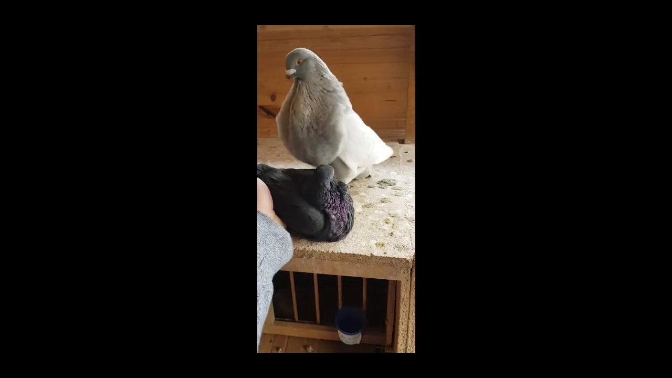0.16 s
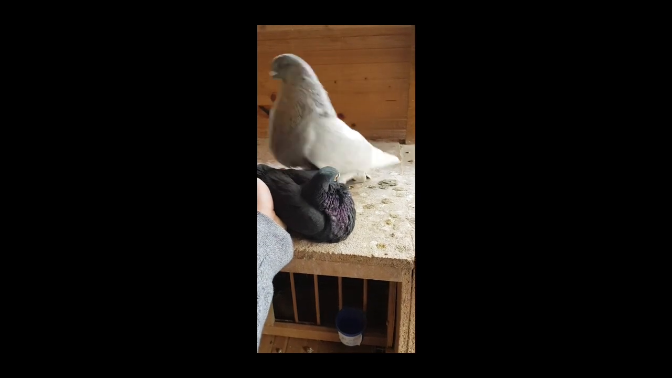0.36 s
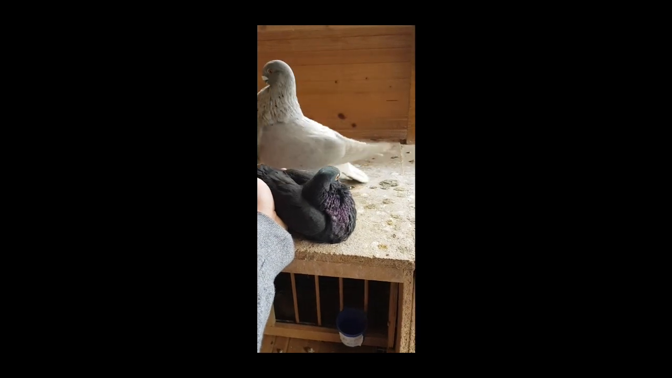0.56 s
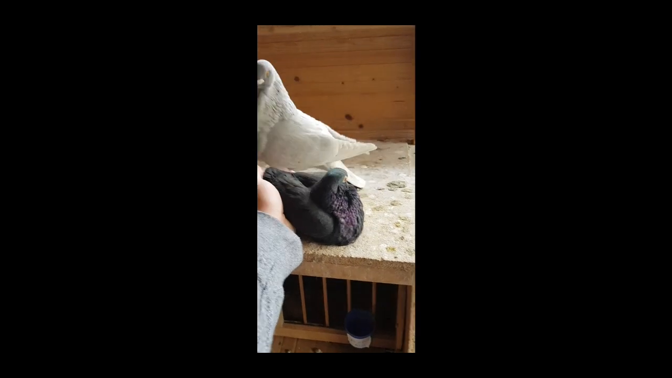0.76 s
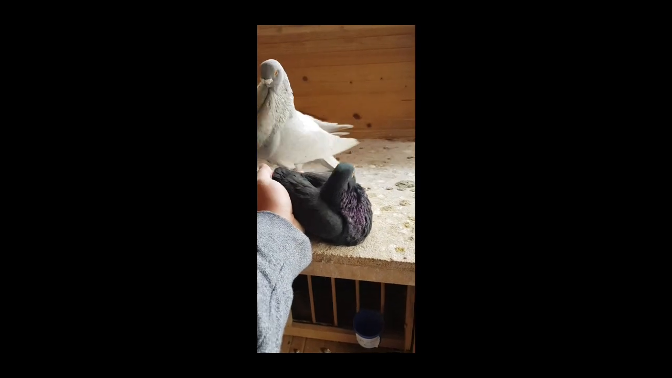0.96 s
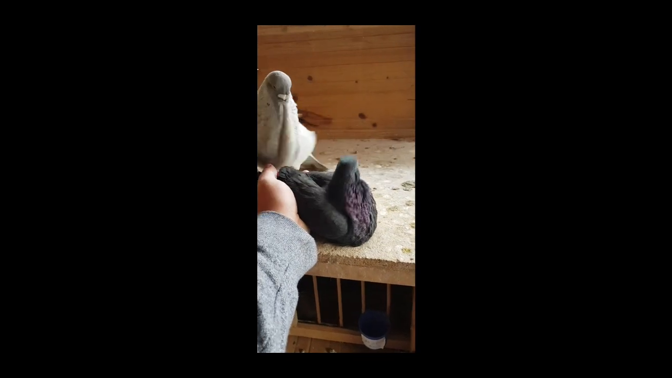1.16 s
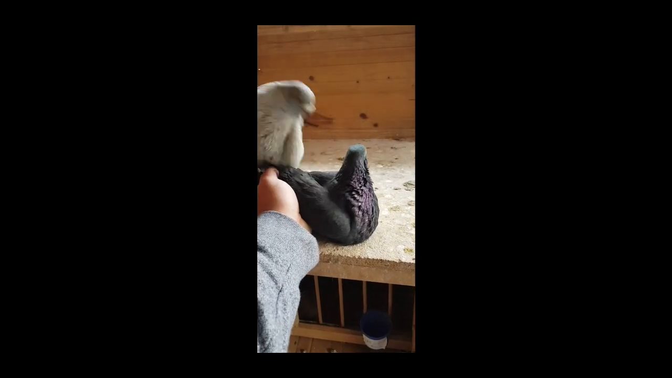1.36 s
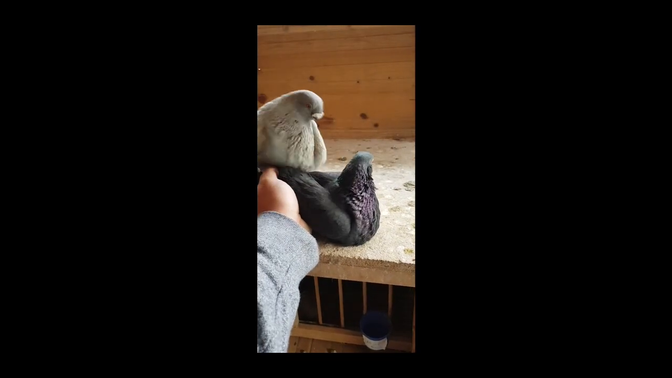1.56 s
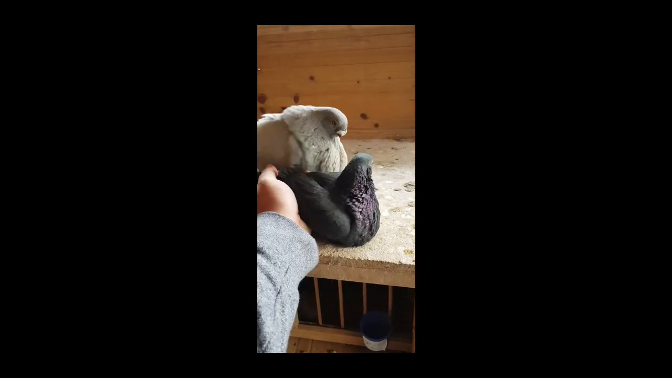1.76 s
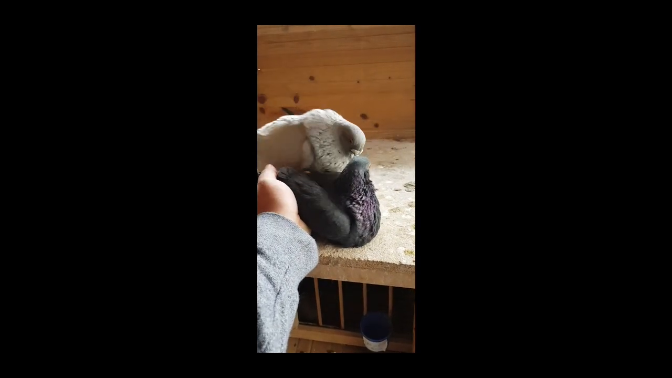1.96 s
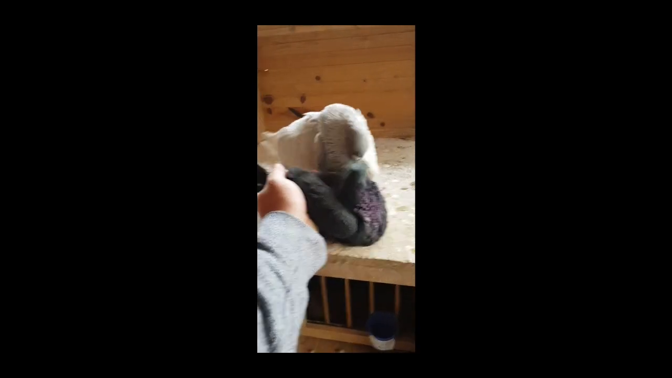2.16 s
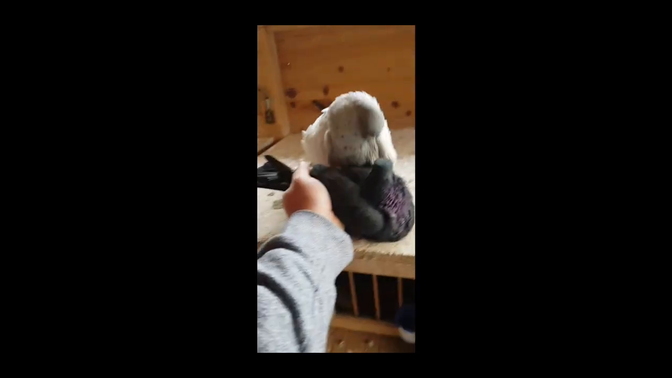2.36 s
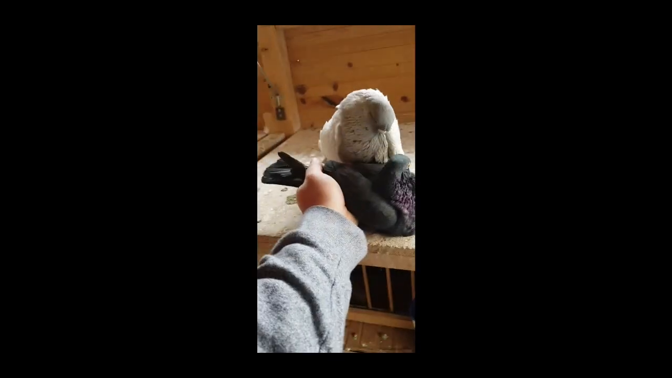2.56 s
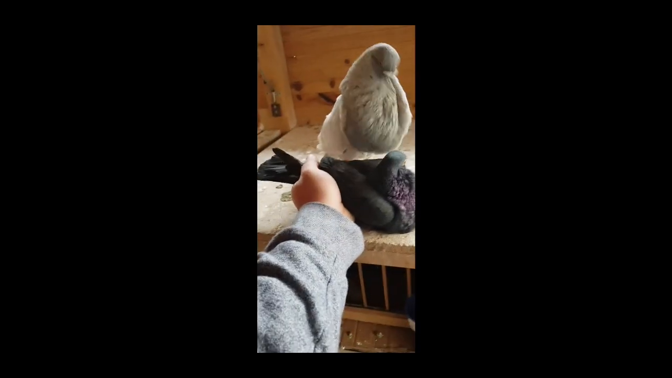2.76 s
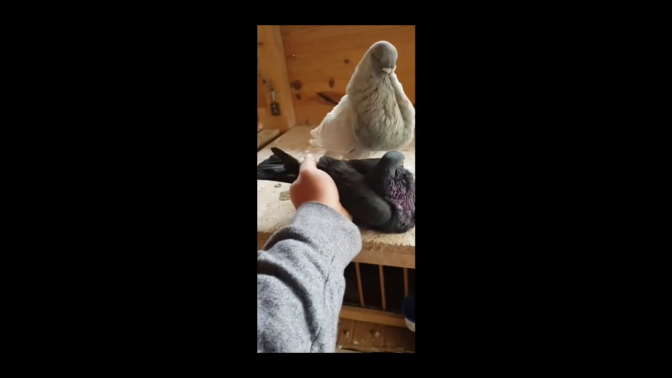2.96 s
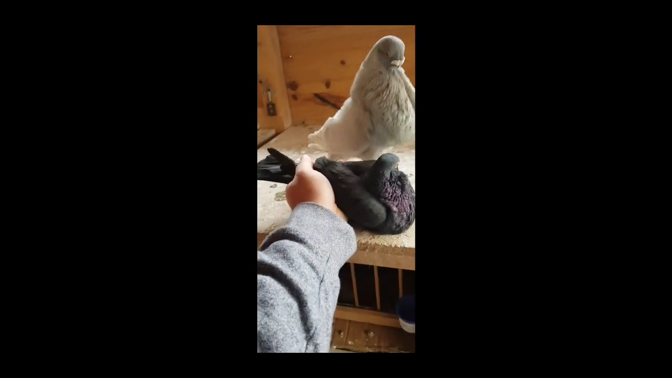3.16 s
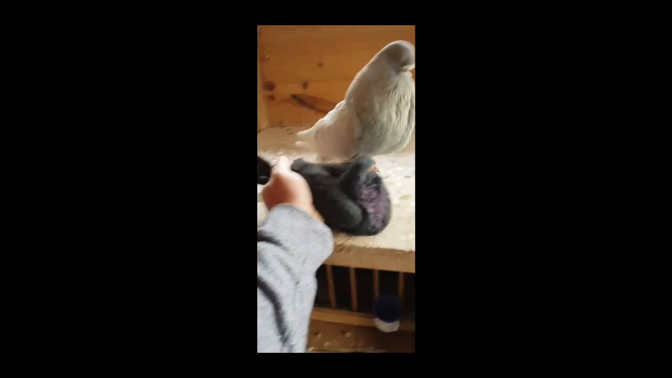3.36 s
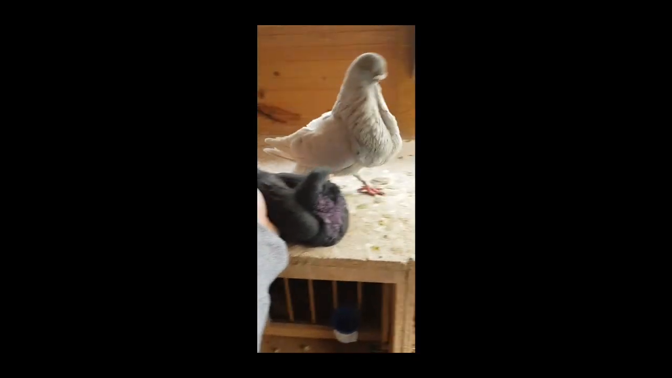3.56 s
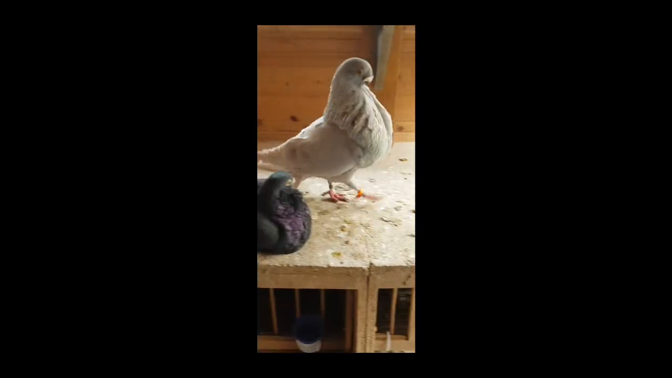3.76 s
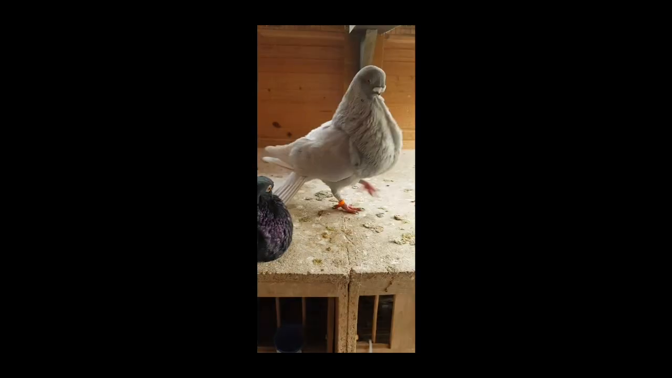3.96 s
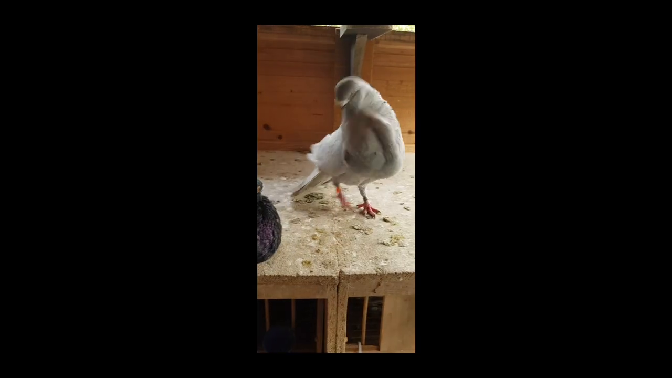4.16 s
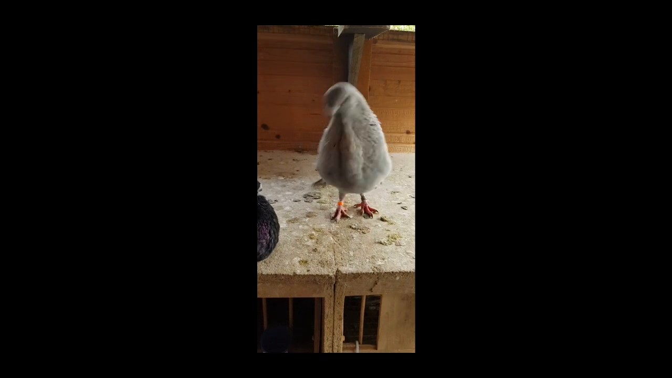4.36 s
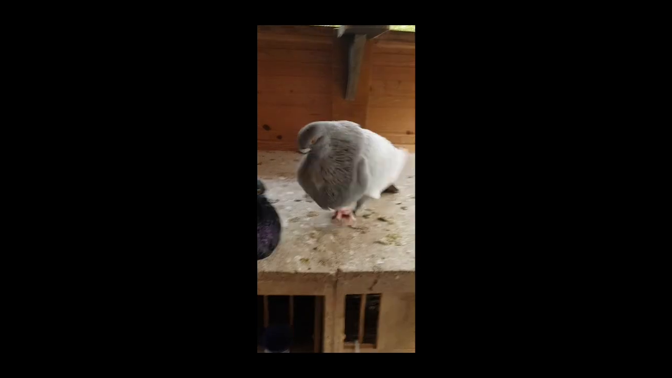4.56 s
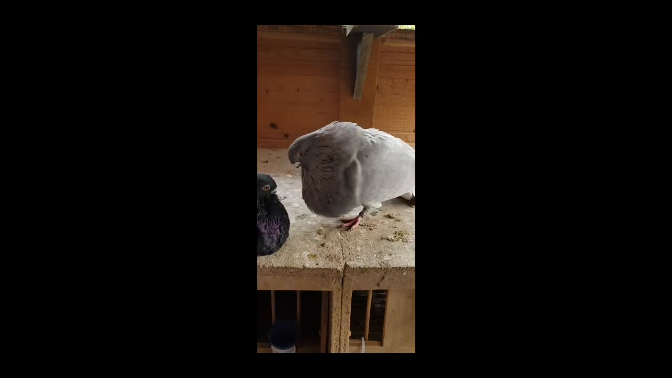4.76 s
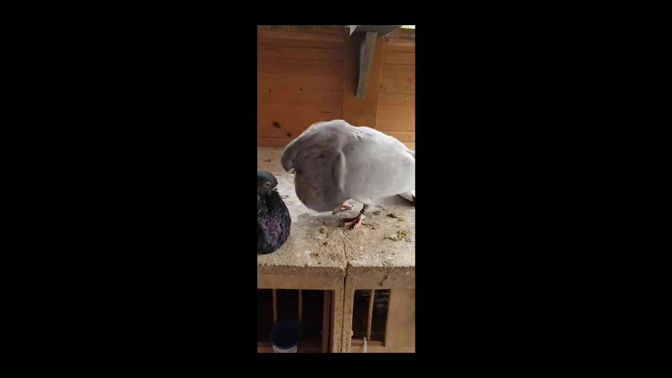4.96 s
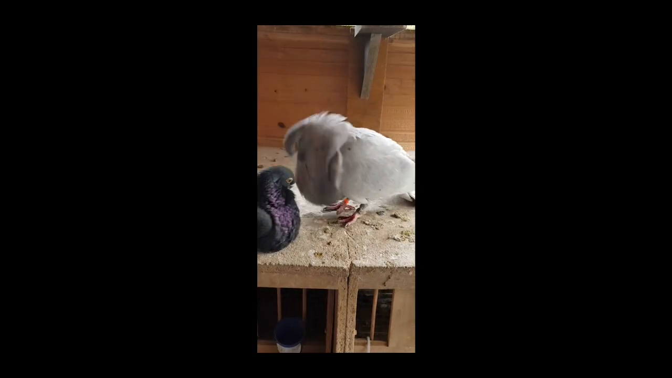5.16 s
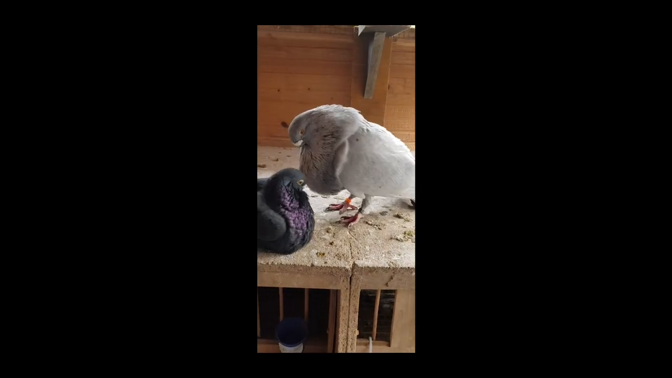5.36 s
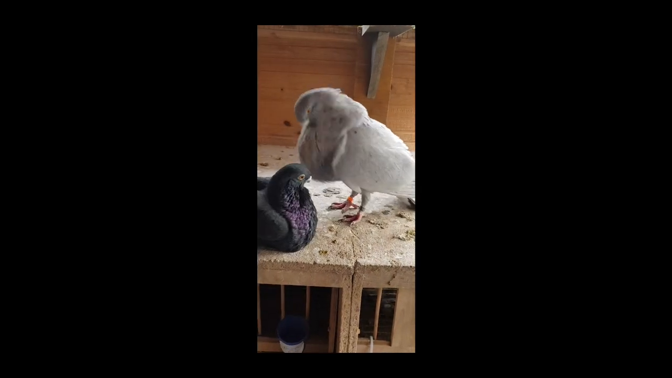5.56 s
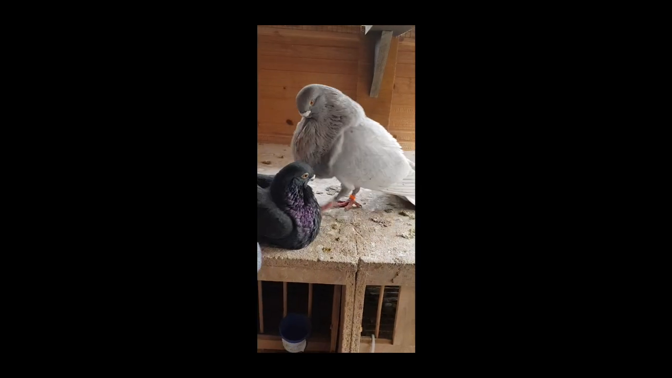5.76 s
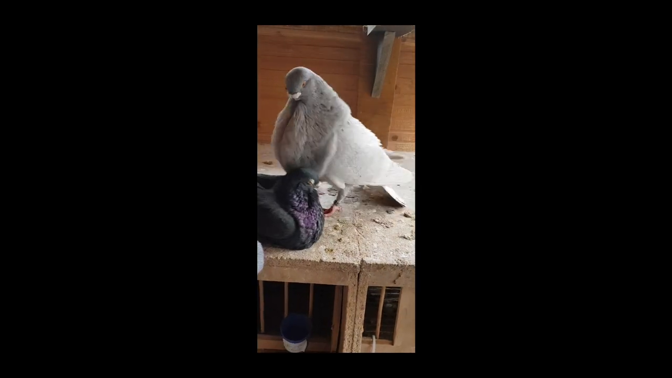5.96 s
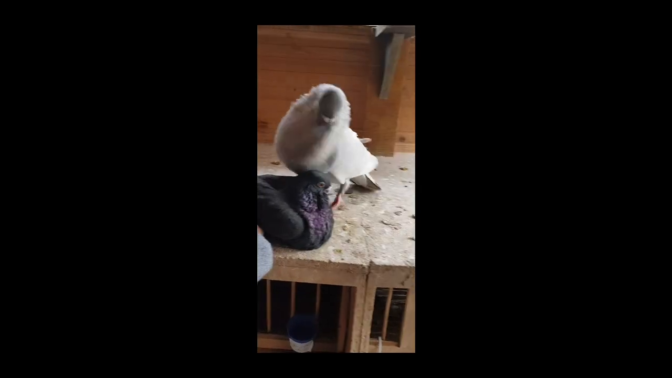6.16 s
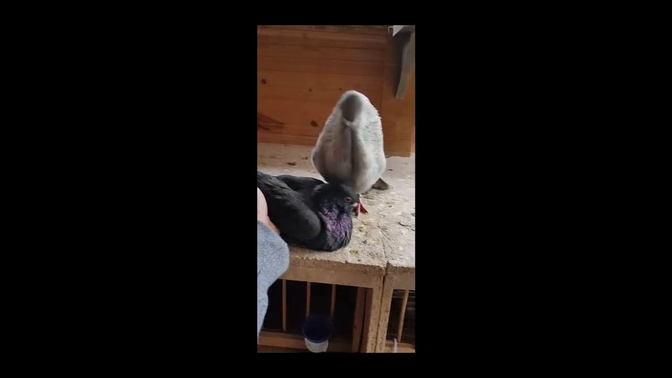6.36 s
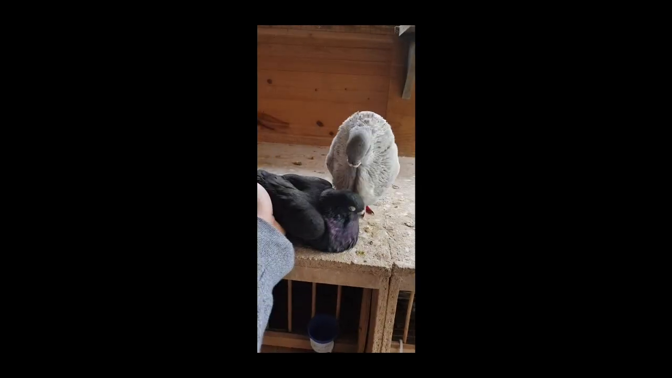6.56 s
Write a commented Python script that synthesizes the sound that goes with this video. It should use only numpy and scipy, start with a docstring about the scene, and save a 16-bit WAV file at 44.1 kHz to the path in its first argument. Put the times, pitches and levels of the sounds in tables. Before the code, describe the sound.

A close pigeon on a hollow wooden shelf in a small indoor loft. From 0.3 to 1.6 seconds, gritty claw steps knock and boom on the board, the first with a faint creak; low grunts sound near 0.7 and 1.15. At about 1.7 the bird starts a coo: separate soft throbs, strongest around 2.25, close into a fast purring roll until 2.6, then a rounded hoot to 2.85 and a fading grunt to 3.2. From 3.3 to 4.4 it is quieter, with light scuffs, crisp ticks, feather swishes and faint distant murmurs. Small grunts at 4.3 and 4.55 lead into a second, somewhat softer coo, rolling around 5.2 and ending in a smooth hoot near 5.75. Afterwards come a short grunt, light steps, far pigeons, tiny peeps near 6.2 and 6.5, and last grunts. Low hum and varying fine hiss continue, with short woody reflections.

```python
"""A pigeon coos twice on a hollow wooden shelf: pulses ring through throat, crop and beak, and at times
a pure tone glides. Bell-shaped throbs of the inflated crop close up into a roll; low grunts follow.
Its claws excite the board's modes in noisy steps and ticks; a board creaks, tail feathers swish as
bands of noise. Farther pigeons murmur in wavering near-sines, a young bird peeps in gliding whistles;
the loft hums in filtered noise, with grainy treble noise that rises and falls, and wooden reflections."""
import sys
import numpy as np
from scipy import signal
from scipy.fft import rfft, irfft, next_fast_len
from scipy.io import wavfile
from scipy.ndimage import uniform_filter1d

SR = 44100
rng = np.random.default_rng(int(sys.argv[2]) if len(sys.argv) > 2 else 0)


def master(y):
    """Save y as 16-bit WAV."""
    cut = np.clip(np.atleast_2d(y).T, -1, 1)
    pcm = np.round(cut * 32767)  # scale
    wavfile.write(sys.argv[1], SR, pcm.astype(np.int16))


N = 291060

# transmission of the inflated crop: frequency_hz, level_db
CROP_PASS = [(170, -40.5), (205, -15), (235, -4.5), (270, -7), (330, -10.5), (440, -5), (480, -19),
             (560, -24.5), (720, -40), (1200, -36.5), (3000, -65.5)]


def gain_of(db):
    """Amplitude ratio: 20 dB is a factor of ten."""
    return 10 ** (np.asarray(db) / 20)


def evened(x):
    """Normalization to unit rms, so that levels can be set in decibels."""
    return x / np.sqrt(np.mean(x ** 2) + 1e-20)


def read(points, hz):
    """Interpolation of a spectral curve on a logarithmic frequency axis."""
    f, value = np.transpose(points)
    return np.interp(np.log(hz + 1), np.log(f + 1), value)


def add(mix, s, sound):
    """Linear superposition of a sound that starts at s seconds."""
    part = mix[..., round(s * SR):][..., :sound.shape[-1]]
    part += sound[..., :part.shape[-1]]


def add_all(mix, rows, source):
    """Superposition of one sound per row: start_s, then the settings of its source."""
    for s, *settings in rows:
        add(mix, s, source(*settings))


def colour(x, points):
    """Linear filtering by a (Hz, dB) curve that falls to -90 dB an octave outside its ends."""
    n = next_fast_len(x.shape[-1] + SR // 10)
    closed = [(points[0][0] / 2, -90), *points, (points[-1][0] * 2, -90)]
    gain = gain_of(read(closed, np.fft.rfftfreq(n, 1 / SR)))
    return irfft(rfft(x, n) * gain, n)[..., :x.shape[-1]]


def curves(rows):
    """Piecewise-linear contours of all columns after time_s."""
    s, *columns = np.transpose(rows)
    t = np.arange(s[0], s[-1], 1 / SR)
    return [np.interp(t, s, c) for c in columns]


def wander(n, hz):
    """Low-pass random fluctuation of unit rms that changes about hz times a second."""
    size = max(round(SR / hz), 2)
    smooth = uniform_filter1d(rng.standard_normal(n), size)
    return evened(uniform_filter1d(smooth, size))


def bump(hz, centre_hz, width_hz):
    """Gaussian resonance curve with a peak of one."""
    return np.exp(-.5 * ((hz - centre_hz) / width_hz) ** 2)


def background():
    """Modulated noise: a gently swelling loft hum under grainy treble noise, drawn for each side."""
    # level of the coarse hiss: time_s, level_db
    coarse_level = [(0, -78), (.85, -77), (1.15, -61.5), (1.5, -62.5), (1.55, -65), (2.301, -67.5),
                    (2.45, -80), (3.051, -78.5), (3.65, -65), (3.9, -59), (4.1, -68), (4.2, -62.5),
                    (4.45, -63), (4.52, -79), (4.6, -77.5), (4.75, -73.5), (5.25, -68.5), (5.42, -83.5),
                    (5.55, -77), (5.95, -66), (6.6, -75.5)]
    # spectra of the coarse hiss, the fine hiss and the hum: frequency_hz, level_db (per Hz)
    coarse_curve = [(1000, -9.5), (3400, -12), (4500, -9), (6000, -5.5), (7800, -14)]
    fine_curve = [(7500, -40), (9000, -8), (11500, -0.5), (14500, -4)]
    hum_curve = [(28, -16.5), (50, 5), (100, -2), (145, -9), (274, -15.5), (396, -10.5), (440, -5.5),
                 (520, -14), (794, -25), (2300, -46.5), (4000, -54)]
    coarse_db = np.interp(np.arange(N) / SR, *np.transpose(coarse_level))
    # the fine hiss follows 0.8 of the coarse hiss's level changes and equals it at -80.5 dB
    even_db, share = -80.5, 0.8
    fine_db = even_db + share * (coarse_db - even_db)
    spectra = (hum_curve, coarse_curve, fine_curve)
    hum, coarse, fine = (evened(colour(rng.standard_normal((2, N)), c)) for c in spectra)
    grain = gain_of(1.2 * wander(N, 60))
    treble = gain_of(coarse_db) * coarse + gain_of(fine_db) * fine
    hum_db = -52.5 + 0.5 * wander(N, 21.0)
    return gain_of(hum_db) * hum + grain * treble


def loft(x, t60):
    """Dense reflections off near wooden walls: a random-signed impulse about every half millisecond, decaying
    with t60 over half a second, drawn separately for each side."""
    taps = np.zeros((2, SR // 2))
    slots = np.arange(120, SR // 2 - 22, 22)
    at = slots + rng.integers(0, 22, (2, len(slots)))
    np.put_along_axis(taps, at, rng.choice([-1., 1.], at.shape), 1)
    taps *= gain_of(-60 * np.arange(SR // 2) / SR / t60)
    return signal.fftconvolve(x, taps / np.linalg.norm(taps[0]), axes=1)[:, :N]


def far_coo(length, first_hz, last_hz, arch_hz, db):
    """Frequency and amplitude modulation: a near-sine glides along an arch with waver and flutter."""
    u = np.linspace(0, 1, round(length * SR))
    hz = first_hz + (last_hz - first_hz) * u + arch_hz * np.sin(np.pi * u)
    wavering_hz = hz * (1 + .025 * wander(len(u), 65))
    tone = np.cos(2 * np.pi * np.cumsum(wavering_hz) / SR)
    flutter_db = 2 * wander(len(u), 65)
    return np.sqrt(2) * gain_of(db + flutter_db) * tone * signal.windows.tukey(len(u), .2)


def far_pigeons():
    """Superposition of the distant murmurs."""
    # start_s, length_s, first_hz, last_hz, arch_hz, level_db
    murmurs = [(0.967, 0.089, 474, 476, -9, -57), (3.316, 0.24, 489, 397.6, 4.5, -70),
               (3.63, 0.21, 421, 518, -13.5, -59.5), (3.901, 0.16, 288, 303, 10, -62),
               (3.967, .142, 348.4, 333, 26, -49), (4.63, 0.15, 424, 524, 9, -57),
               (5.98, 0.14, 455, 487, 22, -59), (6.162, 0.175, 358.6, 375, 86, -45.5),
               (6.215, 0.042, 514, 582, 2, -47), (6.225, 0.11, 370, 355, -2.5, -47.5),
               (6.35, 0.095, 387, 365, 7, -44.5)]
    far = np.zeros((1, N))
    add_all(far, murmurs, far_coo)
    return far


def peep(length, start_hz, end_hz, db):
    """Frequency modulation: a gliding whistle with an unsteady pitch and level."""
    hz = np.linspace(start_hz, end_hz, round(length * SR))
    hz = hz + 45 * wander(len(hz), 600)
    flutter_db = 2.5 * wander(len(hz), 200)
    return gain_of(db + flutter_db) * np.sin(2 * np.pi * np.cumsum(hz) / SR) * np.hanning(len(hz))


def swish(length, hz, db):
    """Band-limited friction noise: tail feathers brush the litter in a grainy swell."""
    n, spread = round(length * SR), 1.5
    band = colour(rng.standard_normal((2, n)), [(hz / spread, -14), (hz, 0), (hz * spread, -14)])
    grain_db = 1.5 * wander(n, 45)
    return gain_of(db + grain_db) * evened(band) * np.sqrt(np.hanning(n))


def creak(db, hz):
    """Narrow-band noise with two decay rates: the board's creak fades fast, then lingers."""
    t, spread = np.arange(0, .12, 1 / SR), 1.12
    band = colour(rng.standard_normal(len(t)), [(hz / spread, -16), (hz, 0), (hz * spread, -10)])
    fade = gain_of(-60 * t / .1) + .15 * gain_of(-60 * t / .4)
    return gain_of(db) * evened(band) * fade * signal.windows.tukey(len(t), .08)


def tick(db, hz):
    """Impulsive excitation: a claw tip gives a short dry snap of noise around one pitch."""
    t, t60, spread = np.arange(0, .05, 1 / SR), 0.021, 1.25
    snap = colour(rng.standard_normal((2, len(t))), [(hz / spread, 0), (hz * spread, 0)])
    return gain_of(db - 60 * t / t60) * evened(snap) / 2


def step(step_db, boom_db, knock_db):
    """Modal excitation: gritty claw contact drives decaying board modes and the boom of the hollow shelf."""
    # modes of the board: frequency_hz, level_db, t60_s
    modes = [(104, 3, .07), (232, -5, .12), (295, -1, .09), (359, 2.5, .09), (479, -0.5, .1),
             (816, -2, .08), (1060, -5, .06)]
    # spectrum of the claw scratch: frequency_hz, level_db (per Hz)
    scratch_curve = [(550, -7), (900, -8.5), (1220, -11.5), (1830, -15.5), (2600, -21.5), (6130, -21.5),
                     (7920, -33), (14500, -32)]
    t = np.arange(round(.4 * SR)) / SR
    # each step scratches with its own colour
    shade = [(hz, db + 4 * rng.standard_normal()) for hz, db in scratch_curve]
    grit = evened(colour(rng.standard_normal((2, len(t))), shade)) * gain_of(2.1 * wander(len(t), 1400))
    landing = np.minimum(t / rng.uniform(.004, .011), 1)
    second_tick = (t > .008) * gain_of(-60 * (t - .008) / 0.078)
    ticks = gain_of(-60 * t / 0.0043) + 0.36 * second_tick
    tail = .5 * gain_of(-60 * t / 0.079) + 0.3 * gain_of(-60 * t / 0.5)
    scratch = grit * landing * (.5 * ticks + tail)
    knock = np.zeros(len(t))
    for hz, db, t60 in modes:
        # each foot lands on another part of the boards, so modes shift and vary in strength
        shift, phase, strength = .92 + .16 * rng.random(), rng.random(), .5 + rng.random()
        ring = np.sin(2 * np.pi * (hz * shift * t + phase)) * np.minimum(t * hz / 2, 1)
        knock += strength * gain_of(db - 60 * t / t60) * ring
    knock *= landing
    boom_hz, boom_t60 = 78.84, 0.41
    boom = np.sin(2 * np.pi * boom_hz * t) * gain_of(-60 * t / boom_t60) * np.minimum(t / 0.041, 1)
    return gain_of(step_db) * (0.47 * scratch + gain_of(knock_db) * knock + gain_of(boom_db) * boom)


def shelf_sounds():
    """Superposition of contact and friction sounds on the shelf, with the thin peeps."""
    # claws on the shelf: start_s, level_db, boom_db and knock_db (both relative to the step)
    footfalls = [(0.274, -37.5, -4, -9), (0.397, -34, -0.5, -7), (0.5409, -31, 7, 2),
                 (0.7318, -35.5, -28, 0), (0.9549, -41, 2.5, 2), (1.148, -33, -2, -4.5),
                 (1.3859, -34, -7.5, -4), (1.609, -37.5, 3, -4), (2.1046, -35, -3, -0.5),
                 (2.3397, -36.5, -2, -1.5), (2.6222, -47, -2, -1.5), (3.297, -40.5, -24, -22),
                 (3.628, -38.5, -86, -20.5), (3.883, -41, -41, -53.5), (4.3981, -45.5, 1.5, -15),
                 (5.2275, -37.5, -11, -13), (5.8804, -40, -8, 0), (6.134, -42.5, -21, 0),
                 (6.3654, -41.5, -33, -5.5), (6.4719, -46, -20, 6)]
    # bright claw-tip ticks: start_s, level_db (noise rms starts 6 dB lower), centre_hz
    claw_ticks = [(3.627, -35.5, 5700), (3.885, -39, 4260), (4.143, -48.5, 5860), (4.401, -42, 5230),
                  (4.9476, -44.5, 5750), (5.2299, -36.5, 5670), (6.514, -43, 6100)]
    # tail feathers over the litter: start_s, length_s, centre_hz, level_db
    feather_swishes = [(1.165, .3, 6060, -75), (4.165, 0.24, 4740, -59.5), (4.367, 0.12, 4800, -57.5),
                       (4.617, .25, 5700, -72.5), (5.495, 0.3, 6070, -73.5), (5.88, 0.32, 5700, -68.5)]
    # a board creaks under one step: start_s, level_db, centre_hz
    board_creak = (.276, -51, 1910)
    # thin squeaks and peeps: start_s, length_s, start_hz, end_hz, level_db
    peep_rows = [(6.2, .07, 5850, 5050, -58), (6.215, .045, 2480, 2500, -59),
                 (6.468, .016, 2330, 2330, -59), (6.487, .035, 2450, 2380, -59)]
    shelf = np.zeros((2, N))
    add_all(shelf, footfalls, step)
    add_all(shelf, claw_ticks, tick)
    add_all(shelf, feather_swishes, swish)
    add_all(shelf, [board_creak], creak)
    add_all(shelf, peep_rows, peep)
    return shelf


def throb(db, hz, low_db):
    """Resonant burst: a bell-shaped voice tone with a longer swell of the crop's low resonance."""
    low_hz, upper_hz = 230.2, 613  # lowest crop resonance, faint upper resonance
    t = np.arange(-.04, .06, 1 / SR)
    width_s = max(0.0027 + 0.000092 * (db + 29), .002)  # stronger throbs last longer
    tone = np.exp(-.5 * (t / width_s) ** 2) * np.cos(2 * np.pi * hz * t)
    swell = np.exp(-.5 * ((t - .002) / np.where(t < .002, .004, .009)) ** 2)
    low = swell * np.cos(2 * np.pi * (low_hz * t + rng.random()))
    overtone = 0.031 * swell * np.cos(2 * np.pi * upper_hz * t)
    # air squeezed out with the throb
    rasp = 0.16 * swell * evened(colour(rng.standard_normal(len(t)), CROP_PASS))
    return gain_of(db) * (tone + overtone + rasp + gain_of(low_db) * low)


def roll(start, end, per_s, first_db, last_db, first_hz, last_hz):
    """Quasi-periodic repetition: throbs at a steady beat with small random deviations, fading and sinking."""
    s = np.arange(start, end, 1 / per_s)
    u = (s - start) / (end - start)
    late, strong, high = rng.standard_normal((3, len(s)))
    db = first_db + (last_db - first_db) * u + 1.1 * strong
    hz = (first_hz + (last_hz - first_hz) * u) * (1 + .015 * high)
    return list(zip(s + .0007 * late, db, hz))


def call(db, hz, throat_hz, weaker, rough, beak_db):
    """Source and filter: syrinx pulses pass throat, crop and beak; strong-weak pairs halve the line spacing."""
    throat_width_hz, throat_db = 42, 11
    n, rough = len(db), np.clip(rough, 0, 1)
    pair_hz = hz / 2 * (1 + .13 * rough * wander(n, 30))
    turns = np.cumsum(pair_hz) / SR + rng.random()
    beak_hz = 565 * np.linspace(1, 1.2, n)  # the beak opens wider, so its resonance rises
    sound = np.zeros(n)
    for k in range(3, 22):
        line_hz = k * pair_hz
        throat = throat_db * bump(line_hz, throat_hz, throat_width_hz)
        passed = gain_of(read(CROP_PASS, line_hz) + throat)
        passed = passed + gain_of(beak_db) * bump(line_hz, beak_hz, 85)
        uneven = gain_of(10.5 * rough * wander(n, 57))  # each line swells and fades on its own
        lag = np.arctan((line_hz - throat_hz) / throat_width_hz)  # phase lag of the throat resonance
        phase = 2 * np.pi * k * turns - lag + 2.0 * rough * wander(n, 21)
        sound += (weaker if k % 2 else 1) * passed * uneven * np.cos(phase)
    rasp = evened(colour(rng.standard_normal(n), CROP_PASS))  # breathy air
    return gain_of(db) * evened(evened(sound) + rough * rasp) * signal.windows.tukey(n, min(500 / n, 1))


def grunt(length, db, fade_db, first_hz, settled_hz, throat_hz, weaker, rough, beak_db):
    """Pulse-rate relaxation: a short call settles in pitch between a quick rise and a quick end."""
    t = np.arange(0, length, 1 / SR)
    u = t / length
    edges = np.minimum(t / 0.0056, 1) * np.minimum((length - t) / 0.025, 1)
    beak_db = beak_db - 7 * (1 - np.sin(np.pi * u))  # the beak opens and shuts again
    hz = settled_hz + (first_hz - settled_hz) * np.exp(-(u / 0.25) ** 2)
    return edges * call(db + fade_db * u, hz, throat_hz, weaker, rough, beak_db)


def coo(rows):
    """Source-filter voice: the pulse rate climbs, then sags; a pure tone at the throat resonance mixes in."""
    db, throat_hz, pure = curves(rows)
    u, pure = np.linspace(0, 1, len(db)), np.clip(pure, 0, 1)
    # odd lines weaken towards the end, so alternate pulses grow more alike
    weaker = 0.87 + (0.45 - 0.87) * u ** 3
    beak_db = -22 + (-53 + 22) * u  # the beak resonance weakens as the beak closes
    rise_hz = 43.52 * u ** 1.6
    sag_hz = 23 * u ** 12  # the air runs out
    buzz = call(db, 89.8 + rise_hz - sag_hz, throat_hz, weaker, 0.25, beak_db)
    beat = np.cumsum(52 * (1 + .2 * wander(len(u), 25))) / SR  # gentle throbbing near 52 Hz
    tone = (1 + .3 * np.cos(2 * np.pi * beat)) * np.cos(2 * np.pi * np.cumsum(throat_hz) / SR)
    tone = gain_of(db) * tone * signal.windows.tukey(len(u), .02)
    return np.sqrt(1 - pure) * buzz + np.sqrt(2 * pure) * tone


def near_pigeon():
    """Superposition of crop throbs, voiced coos and grunts; the low crop tone recovers between throbs."""
    # single throbs, most of them opening a coo: time_s, level_db, tone_hz
    single_throbs = [(1.727, -26, 363), (1.888, -23.5, 398), (1.966, -15, 407), (1.977, -23.5, 420),
                     (2.096, -19.5, 301.6), (2.124, -24.5, 428), (2.196, -18.5, 378.4), (2.246, -12.5, 329),
                     (2.277, -11, 379.5), (4.554, -30, 380), (4.618, -31.5, 365), (4.712, -28.5, 397),
                     (4.78, -21, 384.3), (4.897, -24, 440), (4.908, -23, 450.5), (4.997, -24, 413.6),
                     (5.011, -20.5, 409), (5.086, -16.5, 342), (5.117, -17.5, 375.5), (5.166, -16, 362.5),
                     (5.197, -16.5, 337), (6.476, -29.5, 570)]
    # throbs closed up into a roll: start_s, end_s, throbs_per_s, first_db, last_db, first_hz, last_hz
    roll_rows = [(2.333, 2.598, 49, -12.5, -16.5, 345, 309), (5.221, 5.414, 48, -19, -21, 342.3, 337)]
    # contours of each coo: time_s, level_db, throat_hz, pure_share (0-1)
    coo_contours = [
        [(1.87, -39, 412.9, 0), (2.01, -41.5, 351.9, 0.15), (2.08, -30.5, 304.2, 0.5), (2.15, -32.5, 333, .7),
         (2.225, -23, 378.6, 0.7), (2.31, -30, 343.7, 0.2), (2.5, -36.5, 316.2, 0.2), (2.58, -32.5, 333.8, 0.5),
         (2.66, -24.5, 322.4, 0.1), (2.75, -24.5, 373.5, 0.7), (2.8, -25, 350, .4), (2.85, -27, 343, .3),
         (2.875, -45.5, 370, 0.3)],
        [(4.8, -41.5, 334.1, 0.1), (4.93, -35, 446.4, 0.4), (4.99, -35, 408.2, 0.34), (5.05, -32, 335.3, 0.6),
         (5.14, -24, 335.1, 0), (5.25, -25.5, 335, 0), (5.37, -25.5, 315.9, .6), (5.47, -27, 334, 0),
         (5.53, -26, 324.3, 0), (5.6, -24, 396.7, 0.4), (5.67, -23, 388, .85), (5.695, -23.5, 343, .7),
         (5.73, -27.5, 331.6, 0.7), (5.76, -43, 324, 0.3)],
    ]
    # grunts: start_s, length_s, level_db, fade_db, first_pulse_hz, settled_pulse_hz, throat_hz,
    # odd_line_gain (0-1, strong-weak pairing), roughness (0-1), beak_db (open-beak resonance)
    grunt_rows = [(0.672, 0.23, -40.5, -7.5, 108.2, 86.65, 369.4, 0.18, 0.28, -11),
                  (1.153, 0.15, -37, -3, 110.1, 93.2, 341, 0.1, 0.19, -6),
                  (1.71, 0.076, -32.5, -9.5, 96.2, 84.4, 385, 0.25, 0.6, -27),
                  (2.898, 0.3, -33.5, -19, 101.6, 86.7, 379, 0, 0.25, -52),
                  (4.26, 0.077, -39, -9, 86.3, 80.4, 348, 0.32, 0.4, -2.5),
                  (4.563, .095, -42.5, -9, 92.1, 78.5, 402, 0.56, .35, 4),
                  (5.78, .09, -31.5, -5, 109, 90.2, 366.4, 0.1, 0.2, -58.5),
                  (6.443, .1, -34.5, -12, 120.1, 102.9, 374, 0.5, 0.3, -10),
                  (6.55, 0.071, -40.5, 6, 111.7, 143, 382, 0, 0.08, -51)]
    bird = np.zeros(N)
    throbs = sorted(single_throbs + [row for each in roll_rows for row in roll(*each)])
    pauses = np.diff([0] + [row[0] for row in throbs])
    # low tone relative to the throb: full after a pause, sunk when throbs crowd together
    full_db, sunk_db, refill_s = -3, -34.5, 0.088
    for (s, db, hz), pause in zip(throbs, pauses):
        low_db = sunk_db + (full_db - sunk_db) * min(pause / refill_s, 1)
        add(bird, s - .04, throb(db, hz, low_db))  # the bell peaks .04 s into the burst
    for rows in coo_contours:
        add(bird, rows[0][0], coo(rows))
    add_all(bird, grunt_rows, grunt)
    # the small body radiates little below the crop's lowest resonance
    return colour(bird, [(150, -24.5), (200, 0.5), (8000, -2)])


def scene():
    """Direct and reflected sound: near bird, shelf and far birds with echoes, over the background."""
    near = shelf_sounds() + near_pigeon()
    far = far_pigeons()
    echoes = gain_of(-13) * loft(near + 2 * far, .25)  # far birds excite the loft more
    return near + far + echoes + background()


def record(dry):
    """Interchannel coherence: two close ports agree in the bass and part in the treble, then a band limit."""
    # share that both ports hear alike: frequency_hz, share (0-1)
    same_share = [(30, .92), (80, .6), (200, .9), (420, .8), (560, .1), (900, 0)]
    # phase by which left leads: frequency_hz, lead_rad
    left_lead = [(100, 0), (350, .25), (520, .5), (1030, 1.9), (2330, 7.7), (14000, 40)]
    # level of left over right: frequency_hz, difference_db
    left_balance = [(100, -1.5), (370, -1.5), (700, -9), (1300, -6), (3250, 3.5), (5350, -0.5), (8800, 6.5),
                    (14500, 4.5)]
    n = next_fast_len(N + SR // 10)
    hz, (left, right) = np.fft.rfftfreq(n, 1 / SR), rfft(dry, n)
    same = np.clip(read(same_share, hz), 0, 1)
    right = (same * left + (1 - same) * right) * np.exp(-1j * read(left_lead, hz))
    tilt = gain_of(read(left_balance, hz) / 2)
    pair = irfft(np.array([left * tilt, right / tilt]), n)[:, :N]
    low_pass = signal.firwin(1023, 14700, window=("kaiser", 9), fs=SR)
    return signal.oaconvolve(pair, low_pass[None], "same")


dry = scene()
out = record(dry)
master(out)
```